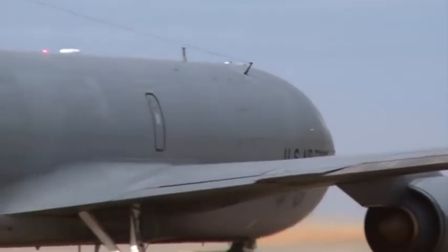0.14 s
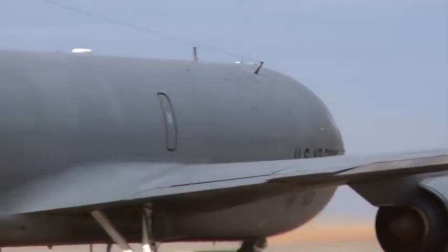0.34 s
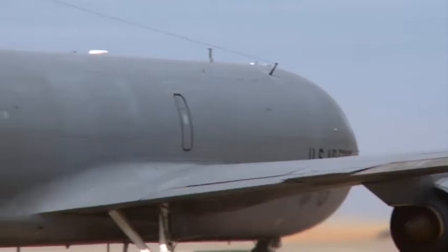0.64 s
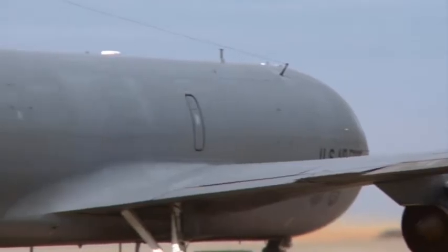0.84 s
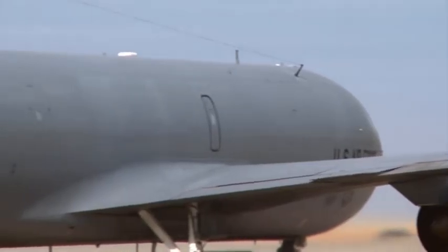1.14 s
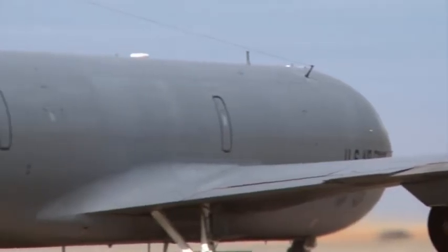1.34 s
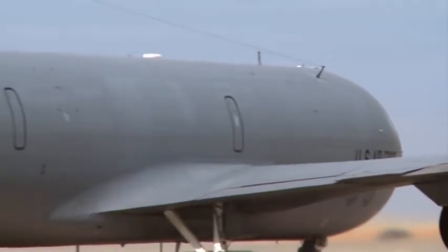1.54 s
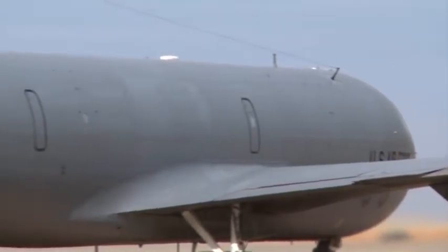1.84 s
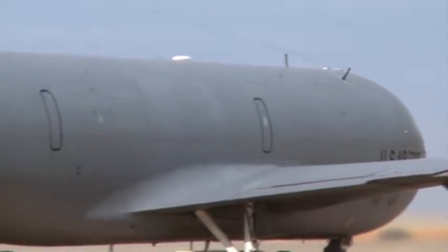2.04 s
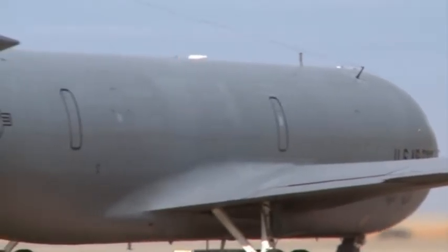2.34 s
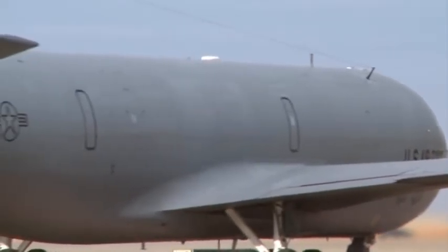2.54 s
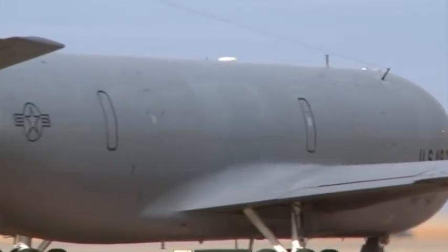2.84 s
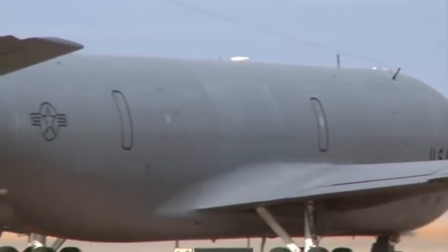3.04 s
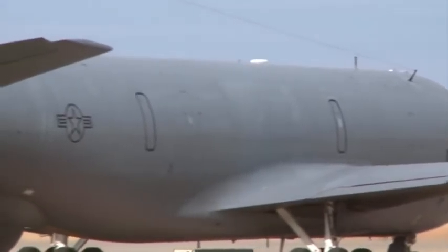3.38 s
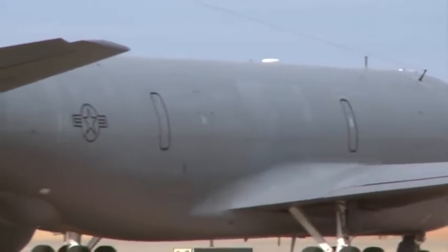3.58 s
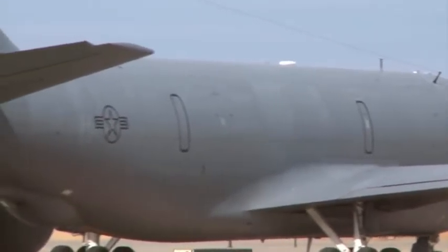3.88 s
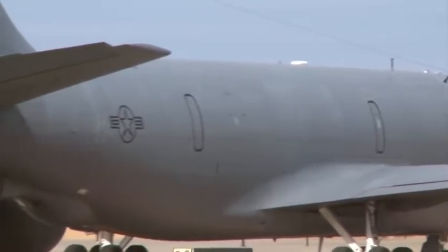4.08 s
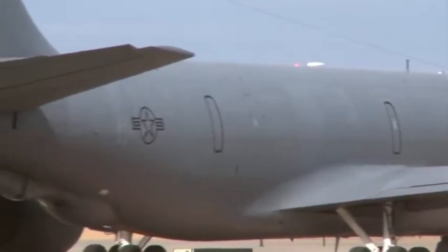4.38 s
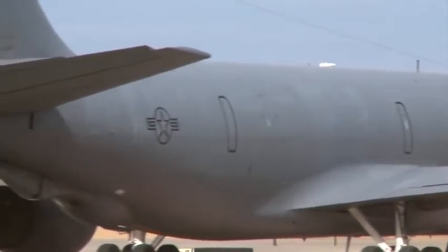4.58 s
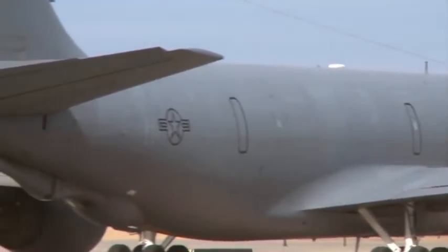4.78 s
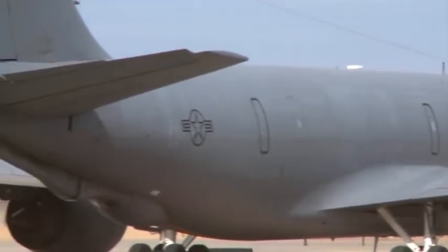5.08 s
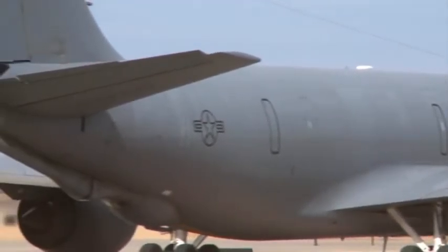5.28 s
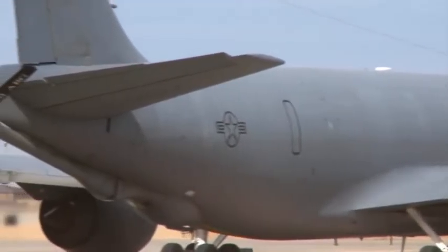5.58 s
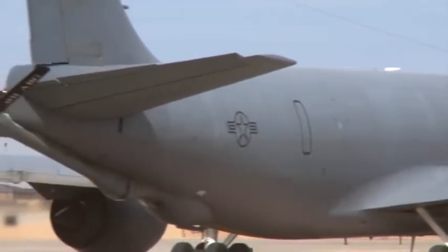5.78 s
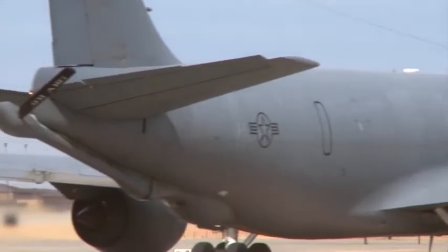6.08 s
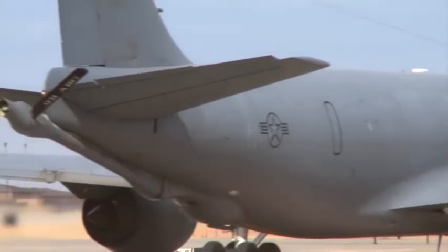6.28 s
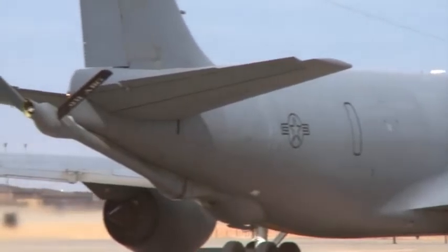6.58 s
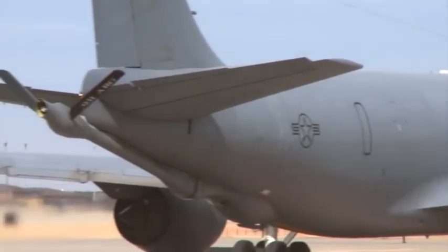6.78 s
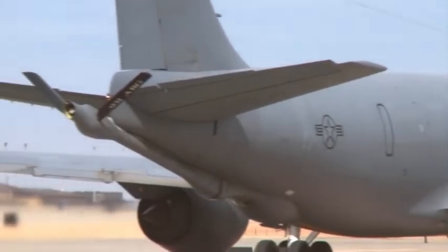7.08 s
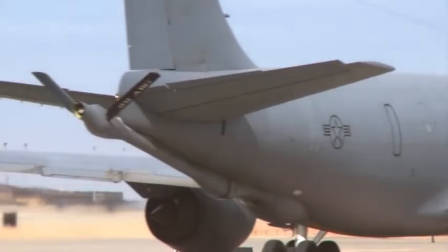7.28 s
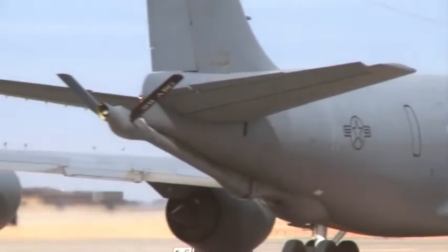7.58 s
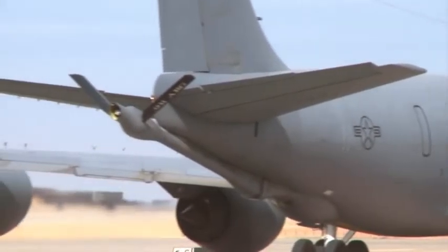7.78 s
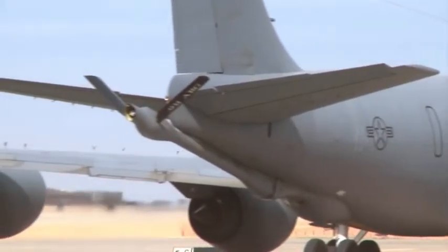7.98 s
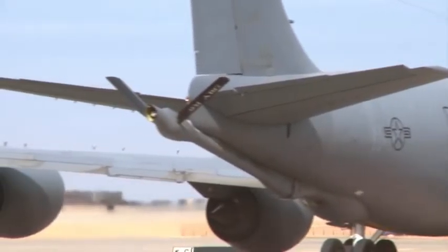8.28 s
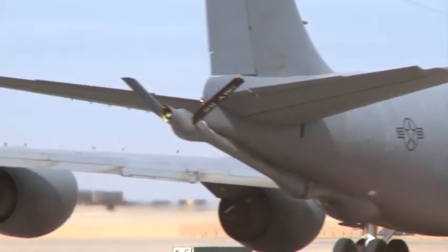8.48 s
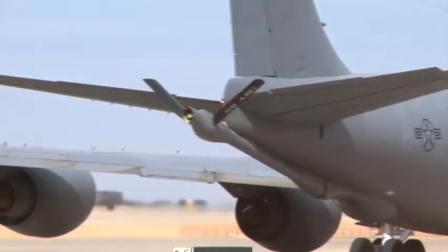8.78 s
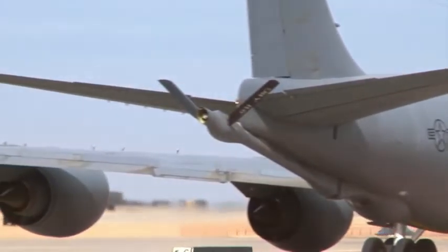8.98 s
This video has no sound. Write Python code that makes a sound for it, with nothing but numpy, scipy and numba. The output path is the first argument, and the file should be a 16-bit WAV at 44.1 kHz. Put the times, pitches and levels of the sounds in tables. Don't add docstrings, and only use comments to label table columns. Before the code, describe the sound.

A large four-engine jet taxis away on an open airfield, heard from a distance through a slightly rough camera microphone, without echoes. From 0 to 2 s it is loudest: deep rumble, low growl and a broad, breathy midrange fan rush, with soft pressure thumps around 0.3, 0.7, 1.5 and 1.9 s and a broken low-mid hum surfacing briefly. Between 1.5 and 3 s the level drops markedly; the high turbine hiss flares near 2.7 s and a tiny dry crack comes at 2.9 s, a fainter one at 4.1 s. The hum fades by about 5 s, where the noise dips to a duller roar. Short gusts make the treble flutter throughout, notably around 5.1 and 7 s. A faint low drone swells near 6.2, 7 and most strongly 8 s, sagging in pitch. From 8.5 s a grainy midrange howl grows and the roar rises slightly until the end at 9.1 s.

```python
import sys
import numpy as np
from scipy import signal
from scipy.fft import rfft, irfft, next_fast_len
from scipy.io import wavfile
from scipy.ndimage import uniform_filter1d, map_coordinates
from numba import njit

SR = 44100
rng = np.random.default_rng(int(sys.argv[2]) if len(sys.argv) > 2 else 0)


def store_pcm(level_fs):
    pcm = np.round(np.clip(level_fs, -1, 1) * 32767).astype(np.int16)
    wavfile.write(sys.argv[1], SR, np.atleast_2d(pcm).T)


def how_loud(loudness_db):
    steps = np.asarray(loudness_db, float) / 20
    return 10 ** steps


N = 402633
T = np.arange(N) / SR
SIZE = next_fast_len(N)
HZ = np.maximum(np.arange(SIZE // 2 + 1) * SR / SIZE, 1)

# centre in seconds, length in seconds, change in dB.
GUSTS = [(.65, 0.14, 1.5), (1.35, 0.059, 3.5), (2.45, .15, 1.5), (2.95, 0.28, 2), (3.85, 0.22, 1),
         (5.08, 0.16, 4), (6.6, .1, 1), (7.03, 0.13, 3), (7.45, 0.13, 2), (8.3, 0.26, -1),
         (8.95, 0.072, 1.5)]


def curves(table):
    s, *columns = np.transpose(table)
    return [np.interp(T, s, c) for c in columns]


def unit(x):
    return x / np.sqrt(np.mean(x ** 2))


def walk(rate):
    k = int(SR / rate)
    held = np.repeat(rng.standard_normal(N // k + 1), k)
    slewed = uniform_filter1d(uniform_filter1d(held, k), k)
    return unit(slewed[:N])


def swells(events):
    return sum(db * np.exp(-((T - s) / length) ** 2) for s, length, db in events)


def settle(centre_s, rise_s):
    return 0.5 + 0.5 * np.tanh((T - centre_s) / rise_s)


def heard(level_db, follow, change_db):
    # time in seconds, level in dB.
    thrust = [(0, 2), (.3, 0), (1.5, -2.5), (2.15, -8), (3.1, -9.5), (4.5, -11), (5.6, -13), (7.2, -11),
              (8.4, -13), (9.13, -10)]
    return how_loud(level_db + follow * curves(thrust)[0] + change_db)


def turbulence(colour, common_db, count, drift_db, flicker_db, flicker_rate):
    hz, db = np.transpose(colour)
    colour_db = np.interp(np.log(HZ), np.log(hz), db, -200, -200)
    spectrum = rfft(rng.standard_normal(SIZE)) * how_loud(colour_db)
    place = np.interp(np.log(HZ), np.log(hz[[0, -1]]), [0, count - 1])
    out = 0
    for k in range(count):
        overlap = np.clip(1 - abs(place - k), 0, 1)
        band = irfft(spectrum * overlap, SIZE)[:N]
        out = out + band * how_loud(drift_db * walk(1.326) + flicker_db * walk(flicker_rate))
    return unit(out * how_loud(common_db))


def turning(side, astern, *texture, **bands):
    # time in seconds, astern share from 0 to 1.
    heading = [(0, 0.08), (1.5, 0), (2.5, 0.52), (4, 0.88), (5.2, 0.88), (9.13, 1)]
    share = np.clip(curves(heading)[0], 0, 1)
    side_on = np.sqrt(1 - share) * turbulence(side, *texture, **bands)
    return side_on + np.sqrt(share) * turbulence(astern, *texture, **bands)


@njit
def svf(x, hz, width):
    y, b, l = np.empty(len(x)), 0., 0.
    for i in range(len(x)):
        g, k = np.tan(np.pi * hz[i] / SR), width[i] / hz[i]
        v = (b + g * (x[i] - l)) / (1 + g * (g + k))
        b, l, y[i] = 2 * v - b, l + 2 * g * v, k * v
    return y


def resonate(hz, width):
    noise = rng.standard_normal(N)
    return unit(svf(svf(noise, hz, width), hz, width))


def hum(hz, db, width_hz):
    return resonate(hz, np.full(N, 1. * width_hz)) * how_loud(db)


def crackles():
    # time in seconds, peak in dB.
    shocks = [
        (2.8784, -52),
        (4.1294, -59),
    ]
    s, db = np.transpose(shocks)[:, :, None]
    gate = np.sum(how_loud(db - 1.0) * np.exp(-((T - s) / 0.0012) ** 2), axis=0)
    return gate * unit(np.diff(rng.standard_normal(N + 1)))


def howl():
    gate = settle(8.53, rise_s=0.15)
    return gate * hum(np.full(N, 806.), -45 + 1.5 * walk(13), width_hz=250)


def shaft():
    # time in seconds, frequency in Hz.
    shaft_rate = [(0, 427), (.3, 414), (.95, 414), (1.15, 431), (1.5, 417), (3.3, 408), (4.3, 390),
                  (4.8, 420)]
    # centre in seconds, length in seconds, change in dB.
    hum_swells = [(.1, .07, 7), (.3, .12, 10), (.62, .12, 9), (1.2, .15, 14), (2.05, .2, 4), (3.3, .6, 6),
                  (4.4, .4, 7)]
    # centre in seconds, length in seconds, change in dB.
    drone_swells = [
        (6.2, 0.61, 15.5),
        (7, 0.49, 9.5),
        (8, .7, 21.5),
    ]
    hz = curves(shaft_rate)[0]
    db = -47 - 3 * T + swells(hum_swells)
    spools = how_loud(-1) * hum(hz, db, 9.0) + how_loud(-10) * hum(hz * 1.035, db, 14.0)
    drone_hz = 145.9 - 6 * settle(7.9, rise_s=0.44)
    return spools + hum(drone_hz, -62.5 + swells(drone_swells), 6.8)


def turbine(shimmer):
    # time in seconds, centre in Hz.
    blade_rate = [(0, 11100), (.8, 11200), (1.8, 11600), (2.7, 11800), (3.4, 11500), (4.2, 11100),
                  (5.4, 10750), (7.2, 10850), (9.13, 10850)]
    # engine's place in the spread, width in Hz, level in dB.
    engines = [(-0.75, 600, -4), (-.15, 500, -1), (0.041, 420, -1), (.5, 550, -2)]
    # centre in seconds, length in seconds, change in dB.
    flares = [
        (.78, .1, 2),
        (2.7, .4, 6),
        (6.15, 0.24, 4),
        (7.15, .25, 1),
        (7.9, 0.11, 1.5),
    ]
    astern = settle(4.7, rise_s=1.2)
    hz = curves(blade_rate)[0]
    spread_hz = 1200 + astern * (800 - 1200)
    out = 0
    for place, width_hz, engine_db in engines:
        centre = hz + place * spread_hz + 60 * walk(2.5)
        width = width_hz * (1.5 - 0.4 * astern)
        out = out + resonate(centre, width) * how_loud(engine_db + 1.2 * walk(4.4))
    beam_db = 9 * astern
    change_db = beam_db + swells(flares) + 0.41 * swells(GUSTS) + 0.7 * shimmer
    return unit(out) * heard(-65, 1.24, change_db)


def duct(shimmer):
    # frequency in Hz, level in dB per Hz.
    fan_side = [(740, -22), (1250, -12), (1580, -2.5), (1740, -6.5), (2270, 2), (3010, -12), (3410, -15),
                (4040, -29), (4300, -37), (5590, -57), (9460, -120)]
    fan_astern = [(740, -20), (1250, -17), (1510, -2.5), (1650, -0.5), (2110, 1.5), (2340, 2), (2670, -2),
                  (2930, -9), (3500, -11.5), (4300, -29), (5590, -66), (9460, -120)]
    hiss_side = [(3400, -18), (4000, 1), (4430, 5.5), (4750, -4), (5300, 1), (6500, -6), (8000, -2.5),
                 (10000, -9), (11000, -9), (12300, 1), (12800, -10), (15700, -14), (17000, -30)]
    hiss_astern = [(3400, -14), (4000, 1), (4430, 2.5), (4750, -4), (5400, 3.5), (6500, -4.5), (8000, -4),
                   (10000, -4.5), (11400, 2), (12000, -10), (15700, -13.5), (17000, -30)]
    gusts_db = swells(GUSTS)
    fan = turning(fan_side, fan_astern, 0.31 * shimmer,
                  count=5, drift_db=0.48, flicker_db=0.97, flicker_rate=30.0)
    hiss = turning(hiss_side, hiss_astern, 0.35 * shimmer,
                   count=6, drift_db=0.8, flicker_db=1.2, flicker_rate=60.0)
    return fan * heard(-35, 0.99, gusts_db) + hiss * heard(-60, 0.75, 0.43 * gusts_db)


def buffets(rumble):
    # time in seconds, peak in dB, frequency in Hz, sign.
    swings = [(0.28, -10.5, 81.5, 1), (0.631, -11.5, 39.8, -1), (.692, -5, 65, -1), (0.849, -11.5, 39, -1),
              (1.504, -6.5, 68, -1), (1.866, -16, 59, -1), (2.0, -15, 44.7, 1)]
    s, db, hz, sign = np.transpose(swings)[:, :, None]
    cycles = (T - s) * hz
    window = np.exp(-(cycles / 0.5) ** 2)
    swing = np.sign(sign) * how_loud(db) * np.cos(2 * np.pi * cycles + 0.24) * window
    return rumble * (1 - np.max(np.sqrt(window), axis=0)) + np.sum(swing, axis=0)


def plume():
    # frequency in Hz, level in dB per Hz.
    rumble_side = [(7.1, -36), (12, 1.5), (59, 1.5), (92, 3.5), (120, -8), (160, -35), (260, -120)]
    rumble_astern = [(7.1, -36), (12, -3.5), (37, 1.5), (49, 1), (70, -2.5), (120, -5), (160, -38),
                     (260, -120)]
    growl_side = [(65, -37), (110, -2.5), (183, -6.5), (297, -16), (343, -12), (371, -25.5), (420, -17.5),
                  (550, -28), (920, -120)]
    growl_astern = [(65, -31), (110, -1), (145, 0), (172, -9), (339, -14), (378, -14.5), (420, -22.5),
                    (550, -31), (920, -120)]
    roar_side = [(240, -12), (400, -5), (424, -3), (515, -8), (693, -1.5), (751, -5), (806, -4),
                 (1270, -11), (1450, -10), (1880, -49), (3190, -120)]
    roar_astern = [(240, -46), (400, -4.5), (431, -4.5), (518, -5.5), (636, -1), (751, -3.5), (819, -1.5),
                   (1170, -9), (1450, -10.5), (1880, -34), (3190, -120)]
    # centre in seconds, length in seconds, change in dB.
    rumble_swells = [(.52, .05, -3), (.72, 0.078, 1), (1.1, 0.085, 1.5), (1.55, 0.2, 3), (1.95, .04, -6),
                     (2.22, .08, -1.5), (2.7, .2, 3.5), (3.6, 0.13, 1.5), (4.4, 0.11, 3), (4.95, .06, -4),
                     (5.3, 0.13, -2.5), (5.6, .07, 2), (6.9, .07, 1), (7.7, 0.17, 3.5), (8.27, 0.075, -4.5),
                     (8.9, 0.25, 2.5)]
    growl_swells = [(.45, 0.057, -2.5), (.7, 0.14, 3.5), (1.55, 0.26, 1.5), (1.85, 0.045, 5),
                    (2.42, 0.051, -1), (2.62, 0.14, 2.5), (4.7, .06, 2), (5.02, 0.2, -3.5), (5.5, .1, -3.5),
                    (6, 0.22, 1), (6.6, .3, 1.5), (7.7, 0.11, 1), (8.15, 0.092, 0.5), (8.4, .06, -2.5),
                    (8.6, .1, 0)]
    roar_swells = [(.05, 0.12, 2), (.75, .1, -1), (.95, 0.15, -1), (1.35, 0.13, 2), (1.6, 0.086, 1),
                   (2.3, 0.22, 2), (3.75, .2, 2), (4.7, 0.087, 2), (4.92, .07, -0.5), (5.5, 0.18, -3),
                   (5.9, 0.087, 0.5), (6.55, 0.2, 2.5), (7.15, 0.26, 2.5), (7.75, 0.12, -0.5),
                   (8.35, 0.22, -0.5), (9, 0.081, 4)]
    rumble = turning(rumble_side, rumble_astern, 0,
                     count=2, drift_db=0.0, flicker_db=0.5, flicker_rate=2.6)
    growl = turning(growl_side, growl_astern, 0,
                    count=3, drift_db=-1.0, flicker_db=0.96, flicker_rate=9.7)
    roar = turning(roar_side, roar_astern, 0,
                   count=4, drift_db=0.86, flicker_db=-1.67, flicker_rate=9.0)
    large = buffets(rumble * heard(-24, 0.85, swells(rumble_swells)))
    middle = growl * heard(-29.5, 0.77, swells(growl_swells))
    small = roar * heard(-31.5, 1.13, swells(roar_swells))
    return large + middle + small


def scene():
    shimmer = 0.27 * walk(30) + 0.64 * walk(110)
    engine = crackles() + howl() + shaft() + turbine(shimmer) + duct(shimmer) + plume()
    return engine[None]


def crude_resample(x):
    camera_sr, block_in, block_out = 48000, 1024, 941
    block, step = np.divmod(np.arange(N), block_out)
    picked = block * block_in + step * camera_sr // SR
    return map_coordinates(x, [picked * block_out / block_in], order=3, mode="nearest")


def gate_air(x):
    air = irfft(rfft(x, SIZE) * (HZ > 15130) * (HZ < 15800), SIZE)[:N]
    quiet = uniform_filter1d(air ** 2, 1536) < how_loud(-85.7) ** 2
    return x - air * uniform_filter1d(1. * quiet, 1024)


def low_pass(x):
    return signal.sosfilt(signal.butter(12, 15660, fs=SR, output="sos"), x)


def record(dry):
    track = gate_air(crude_resample(dry[0]))
    return low_pass(track[None])


dry = scene()
out = record(dry)
store_pcm(out)
```